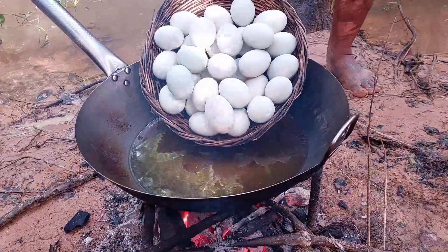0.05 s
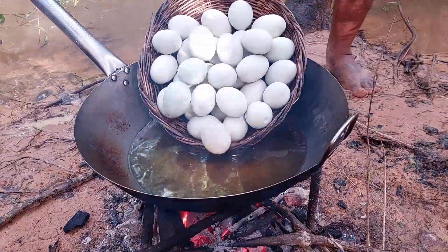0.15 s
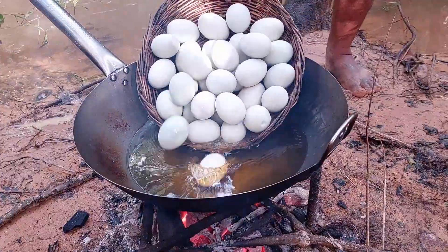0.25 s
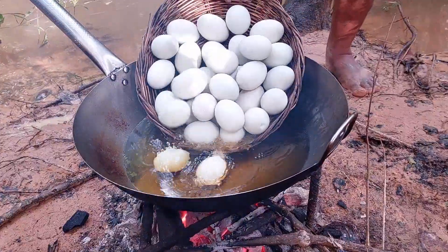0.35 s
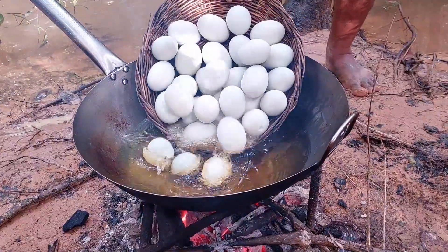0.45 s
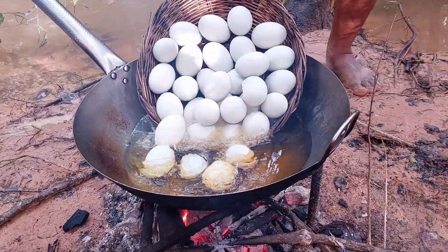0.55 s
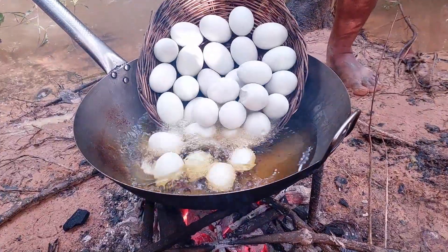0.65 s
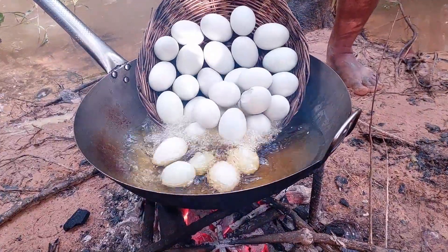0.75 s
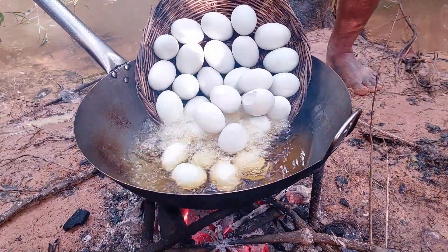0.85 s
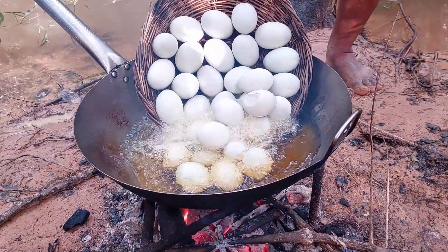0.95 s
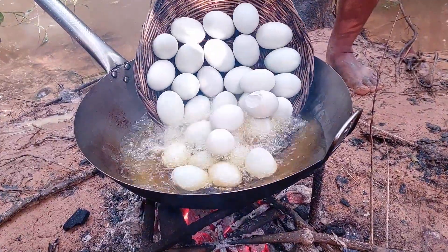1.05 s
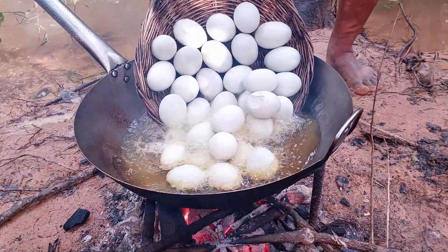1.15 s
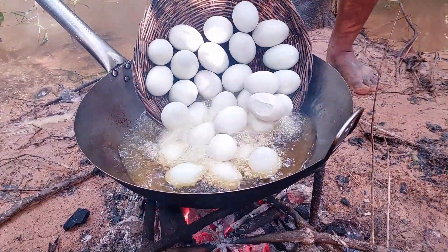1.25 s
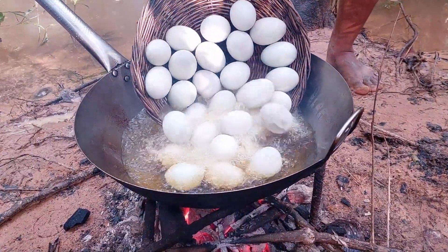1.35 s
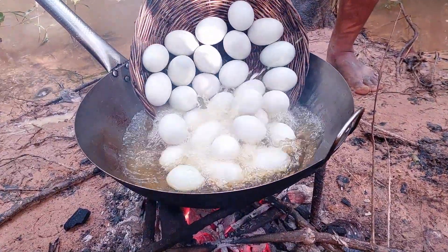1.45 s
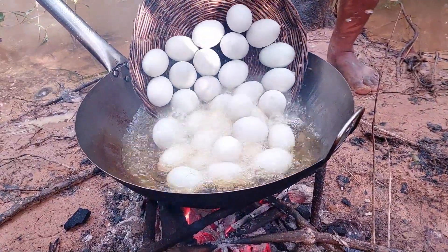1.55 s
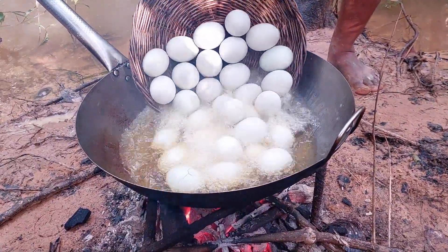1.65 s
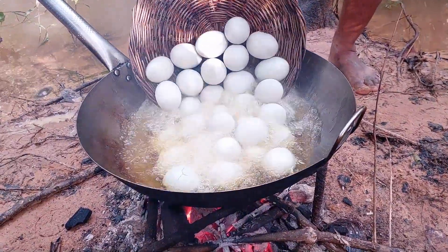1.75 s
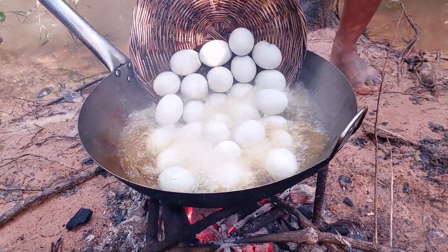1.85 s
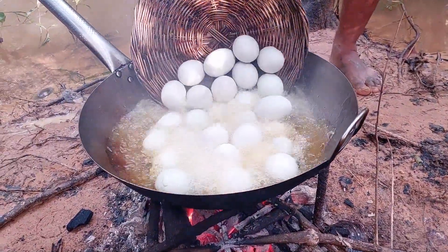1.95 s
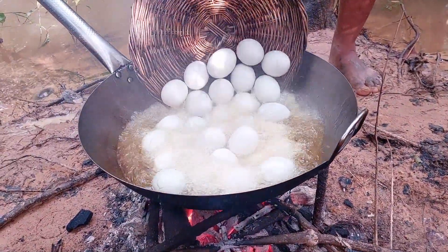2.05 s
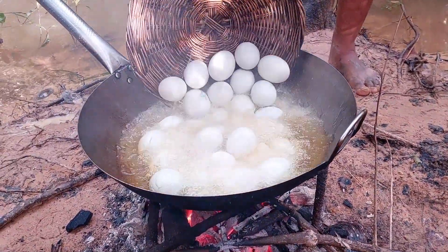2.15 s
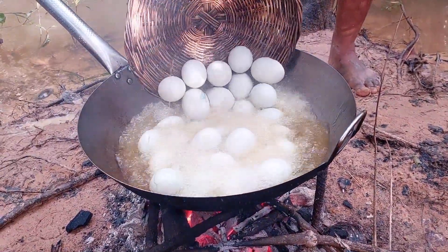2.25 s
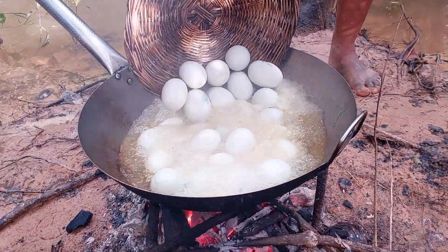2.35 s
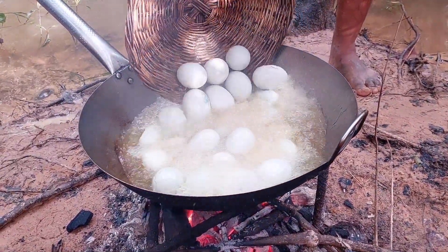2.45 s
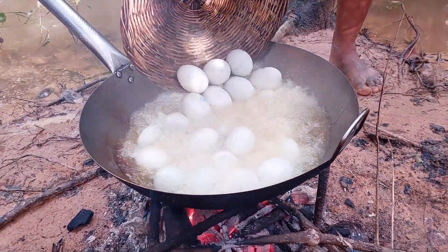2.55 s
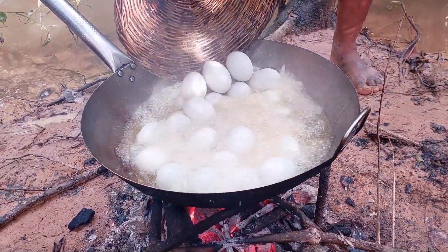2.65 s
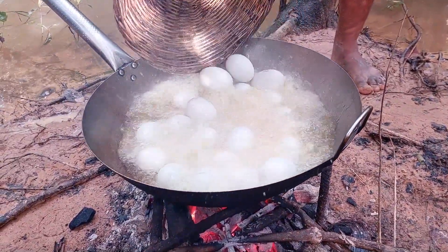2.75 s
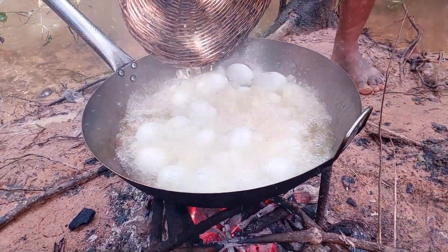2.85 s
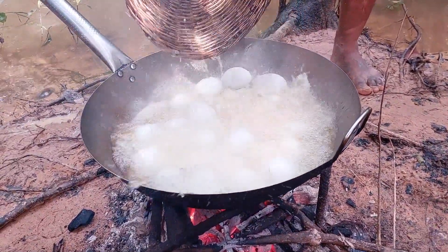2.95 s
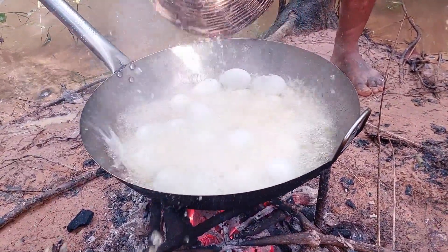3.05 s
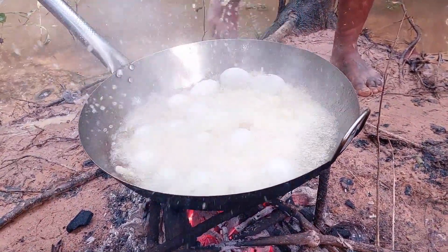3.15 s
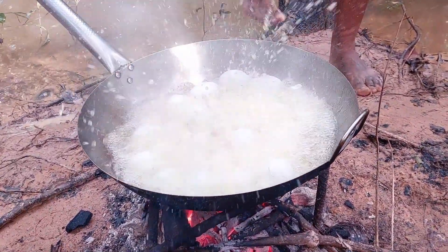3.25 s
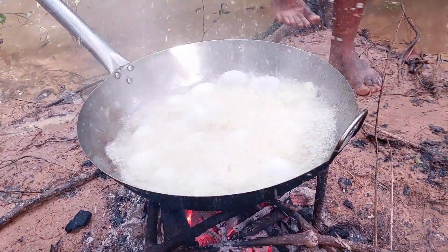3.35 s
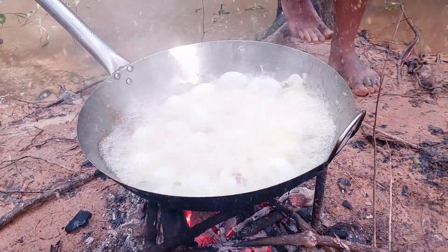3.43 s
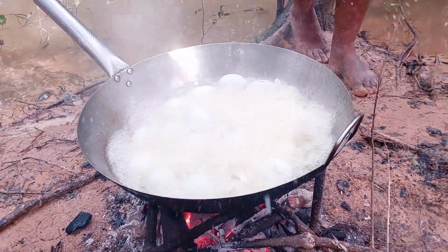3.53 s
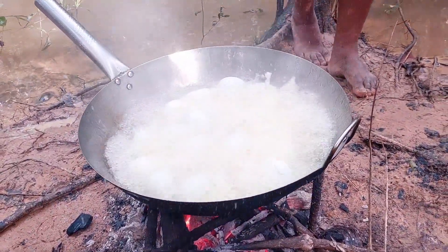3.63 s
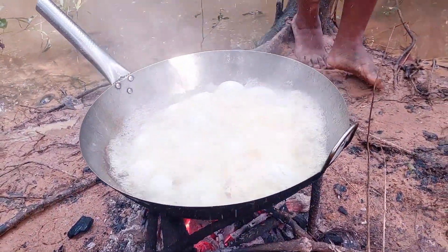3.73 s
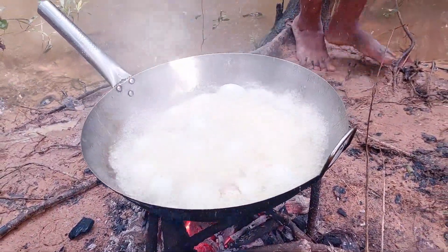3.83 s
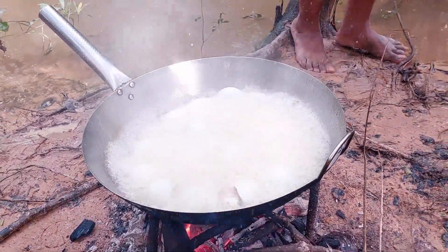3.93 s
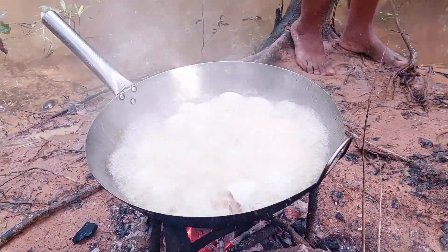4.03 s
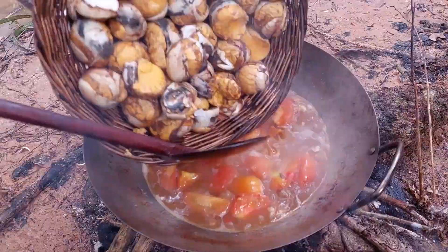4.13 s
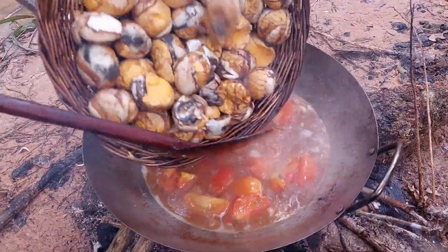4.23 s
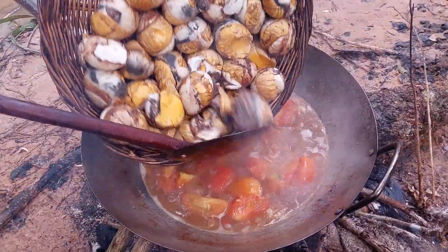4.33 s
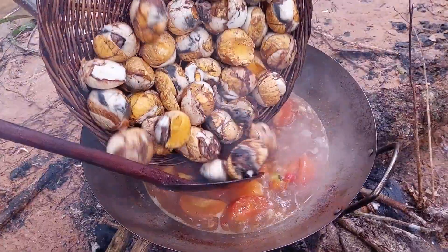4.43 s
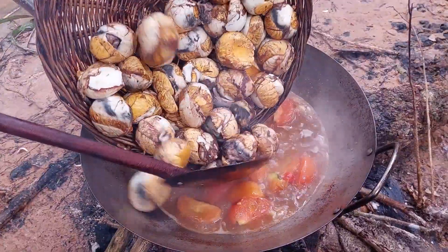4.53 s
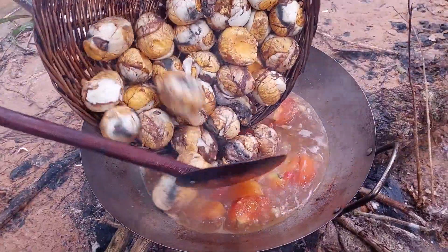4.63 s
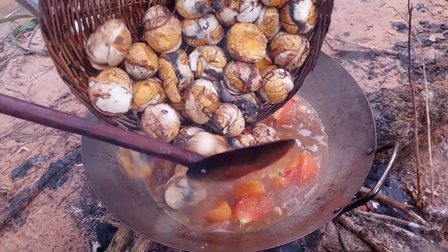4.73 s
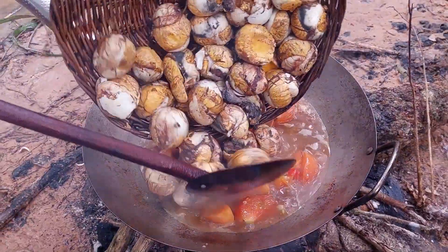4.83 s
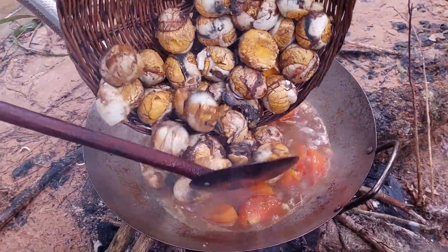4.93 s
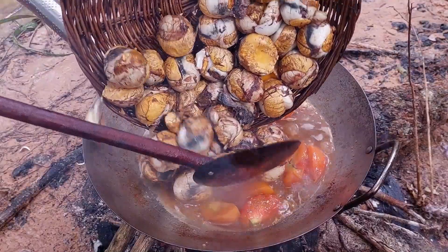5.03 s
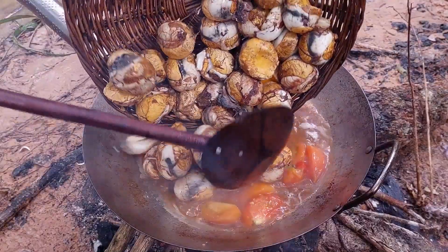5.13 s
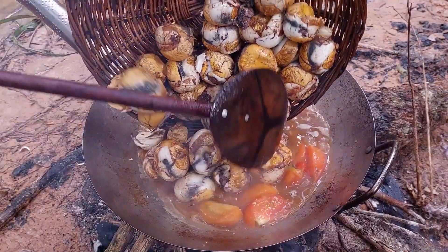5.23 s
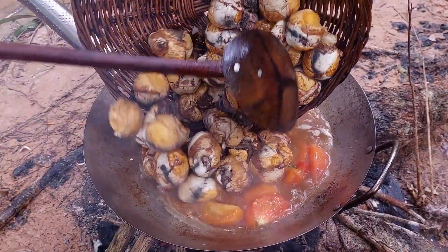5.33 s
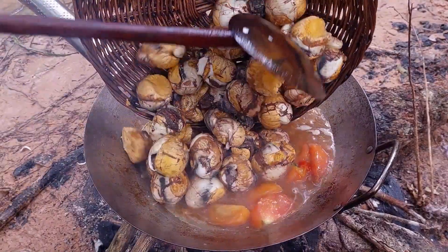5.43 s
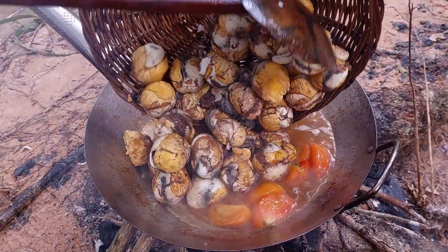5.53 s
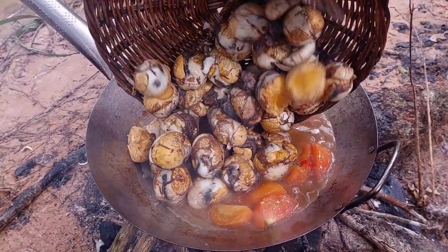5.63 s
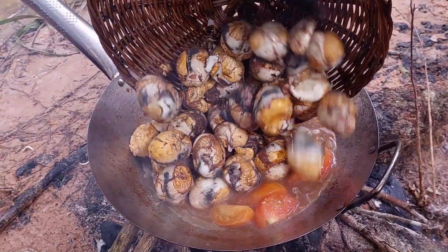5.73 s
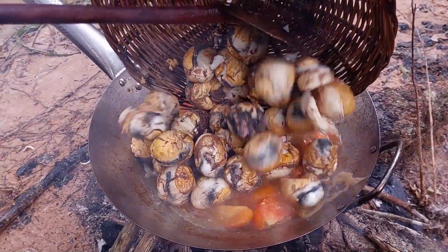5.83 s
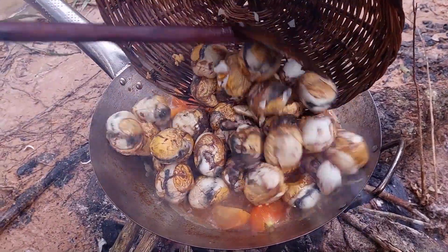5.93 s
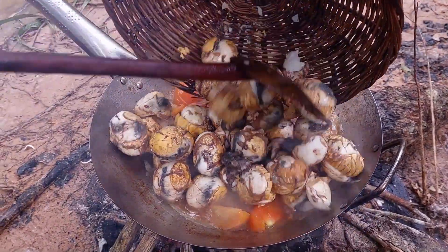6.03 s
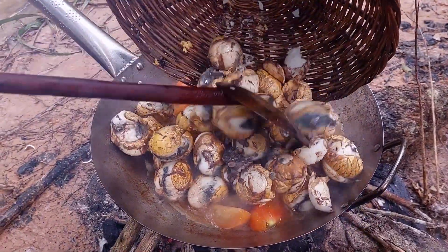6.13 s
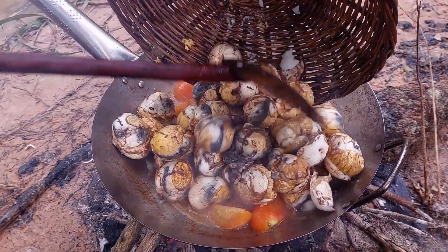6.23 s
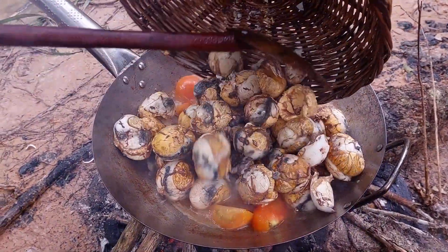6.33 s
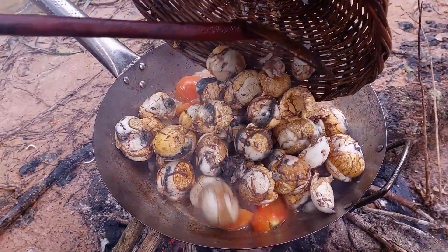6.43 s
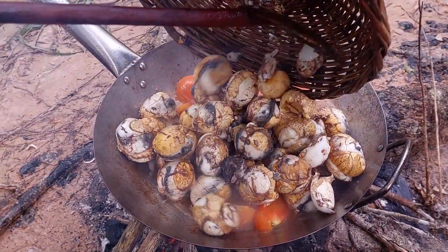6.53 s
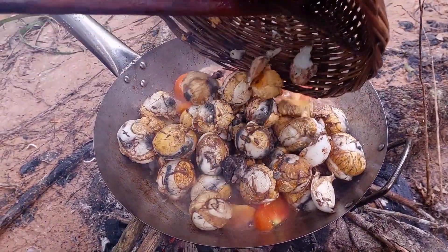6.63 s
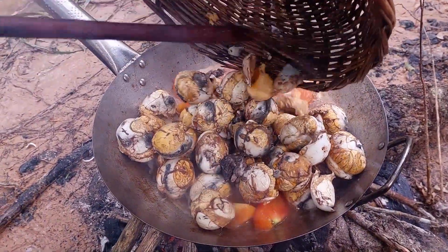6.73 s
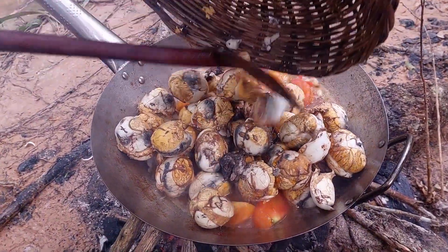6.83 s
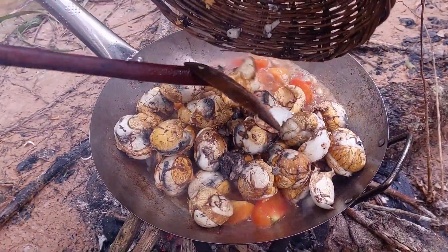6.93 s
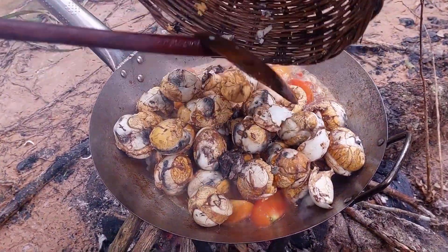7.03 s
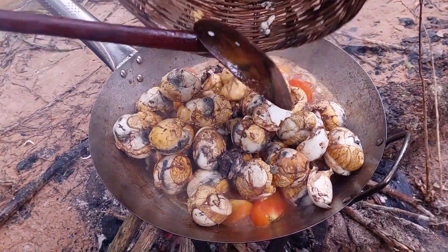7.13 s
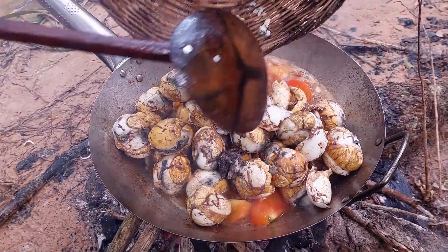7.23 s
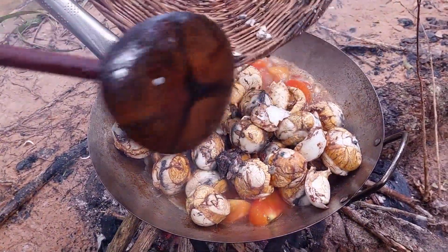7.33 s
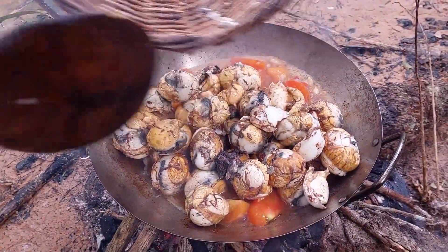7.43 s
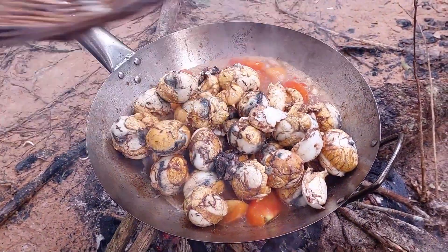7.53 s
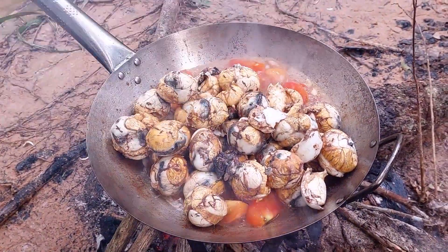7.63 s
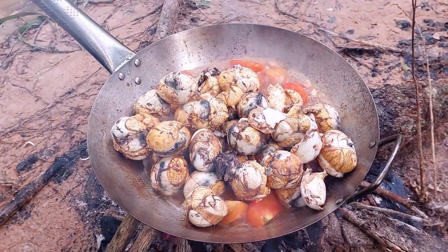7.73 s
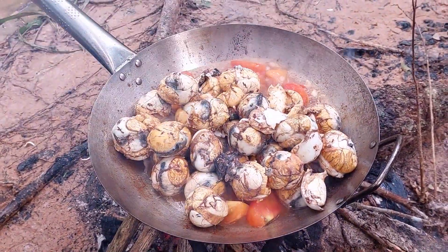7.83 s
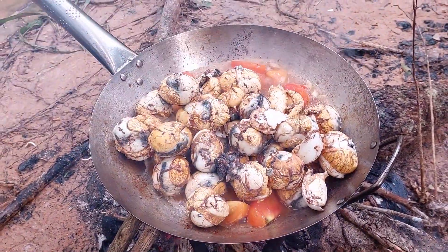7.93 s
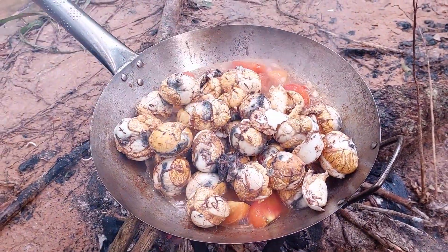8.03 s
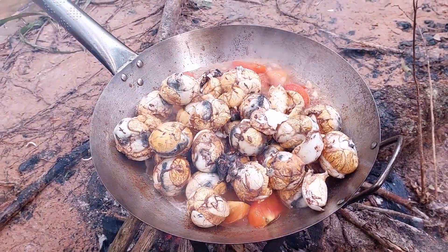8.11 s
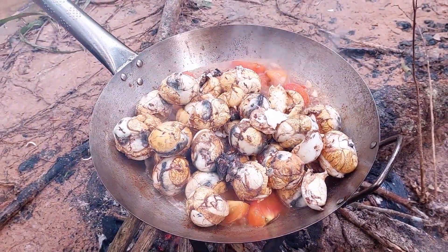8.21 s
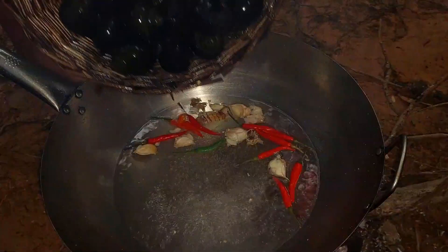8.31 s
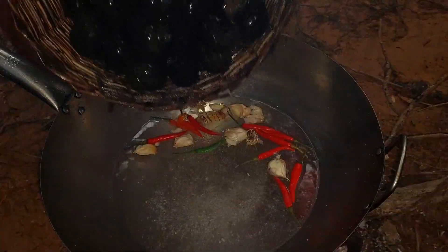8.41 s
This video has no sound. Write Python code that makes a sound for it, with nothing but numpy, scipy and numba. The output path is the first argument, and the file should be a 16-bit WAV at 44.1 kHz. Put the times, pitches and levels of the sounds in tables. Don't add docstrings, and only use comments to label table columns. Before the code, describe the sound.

A faint fire roar and first sizzle grow within seconds into roaring oil, hollow in the metal bowl, with hard shell clacks, wet plops and snapping droplets. The sound suddenly drops to soft blubbing sauce and small wicker ticks. A crisp sizzling flare rises just before six seconds, dies away, then dull knocks of ladle and food end in near calm. Close microphone, dry open air.

```python
import sys
import numpy as np
from scipy import signal
from scipy.fft import rfft, irfft, next_fast_len
from scipy.io import wavfile
from scipy.ndimage import uniform_filter1d, map_coordinates
from numba import njit

SR = 44100
rng = np.random.default_rng(int(sys.argv[2]) if len(sys.argv) > 2 else 0)


def voltage_ratio(decibels):
    exponent = np.asarray(decibels, float) / 20
    return 10 ** exponent


def file_out(sig):
    cols = np.atleast_2d(sig).T
    lim = np.clip(cols, -1, 1)
    pcm = np.round(lim * 32767).astype(np.int16)
    wavfile.write(sys.argv[1], SR, pcm)


N = 373527
TIME = np.arange(N) / SR
CHANGE_S, LAST_CHANGE_S = 4.174, 8.33


def unit(x):
    return x / np.sqrt(np.mean(x ** 2) + 1e-20)


def along(points, hz):
    f, value = np.transpose(points)
    return np.interp(np.log(hz + 1), np.log(f + 1), value)


def over_time(points):
    return np.interp(TIME, *np.transpose(points))


def wobble(rate):
    knots = rng.standard_normal(int(N * 40 / SR) + 4)
    return map_coordinates(knots, [np.arange(N) * min(rate, 40) / SR])


def filtered(x, response):
    m = next_fast_len(N + 8192)
    return irfft(rfft(x, m) * response(np.fft.rfftfreq(m, 1 / SR)), m)[..., :N]


@njit
def add(out, rows, sr):
    for s, size, hz, t60, rise, attack, lag, right in rows:
        for port in range(2):
            start = (s + port * lag) * sr
            first = int(start) + 1
            gain = size * (right if port else 1.0)
            for i in range(max(first, 0), min(first + int(t60 * sr), out.shape[1])):
                t = (i - start) / sr
                swell = (1 - np.exp(-t / attack)) * np.exp(-np.log(1000) * t / t60)
                out[port, i] += gain * swell * np.sin(2 * np.pi * hz * t * (1 + rise * t / t60))
    return out


def rings(s, size, hz, t60, rise=0, attack=1e-5, lag=0, right=1):
    rows = np.broadcast_arrays(s, size, hz, t60, rise, attack, lag, right)
    return add(np.zeros((2, N)), np.stack([np.ravel(r) for r in rows], axis=1).astype(float), SR)


def burst(s, size, hz, wide_db, t60, smear, right=1):
    late, pitch, lag = rng.standard_normal((len(s), 3, 12)).T.swapaxes(0, 1)
    hz = np.minimum(hz * voltage_ratio(wide_db * pitch), SR / 2.5)
    return rings(s + smear * np.abs(late), size / np.sqrt(8), hz, t60, lag=5e-5 * lag, right=right)


# pitch_hz, correlation
LIKENESS = [(60, 0.6), (150, 0.62), (380, 0.82), (950, 0.57), (2380, 0.55), (5980, 0.055), (15000, -0.08)]


def seethe(spectrum, count, cycles, size_db, share, patchy_db):
    f = np.transpose(spectrum)[0]
    when, pitch, big = rng.random((count, 3)).T
    hz = f[1] * (f[-2] / f[1]) ** pitch
    lag = 7e-5 * rng.standard_normal(count)
    bubbles = rings(when * N / SR, voltage_ratio(-size_db * np.log(big + 0.022)), hz, cycles / hz, rise=0.38, lag=lag)
    bubbles = filtered(bubbles, lambda hz: voltage_ratio(along(spectrum, hz)) * hz)

    z = signal.stft(rng.standard_normal((2, N)), nperseg=256)[2]
    patches = uniform_filter1d(rng.standard_normal(z.shape[1:]), size=5, axis=0)
    patches = uniform_filter1d(patches, size=8, axis=1)
    pair = signal.istft(z * voltage_ratio(patchy_db * unit(patches)), nperseg=256)[1][:, :N]

    def mid_side(hz):
        turn = np.arccos(np.clip(along(LIKENESS, hz), 0, 1)) / 2
        return voltage_ratio(along(spectrum, hz)) * np.array([np.cos(turn), np.sin(turn)])

    mid, side = filtered(pair, mid_side)
    bed = np.array([mid + side, mid - side])
    share = np.clip(share, 0, 1)
    return np.sqrt(share) * unit(bubbles) + np.sqrt(1 - share) * unit(bed)


# pitch_hz, density_db
SPATTER_SPECTRUM = [(1200, -40), (2500, -19), (5000, -2), (8500, -15.5), (12800, 3), (15500, -12),
                    (17000, -48)]


def spatter():
    clicks = seethe(SPATTER_SPECTRUM, count=900, cycles=1.5, size_db=3.5, share=1, patchy_db=0)
    tear = rng.standard_normal((1, 40)) * np.hanning(40)
    return unit(clicks + signal.fftconvolve(clicks, tear / 4, axes=1)[:, :N])


def boil(levels, froth, gurgle, crackle, steam, surge_db, coarse, deep):
    froth_db, gurgle_db, crackle_db, steam_db = levels
    surge = surge_db * wobble(18)
    foam = seethe(froth, count=8500, cycles=8.6, size_db=2.5, share=0.52 * coarse, patchy_db=2.0)
    shallow = filtered(foam, lambda hz: 1 / (1 + (1600 / (hz + 1)) ** 9))
    out = voltage_ratio(froth_db + surge + 0.84 * coarse * wobble(30)) * (deep * foam + (1 - deep) * shallow)
    out += voltage_ratio(gurgle_db + surge + 1.3 * wobble(25)) * seethe(
        gurgle, count=2200, cycles=4.7, size_db=1.5, share=0.49 * coarse, patchy_db=1.2)
    out += voltage_ratio(crackle_db + surge + 1.16 * coarse * wobble(30)) * seethe(
        crackle, count=12000, cycles=7.8, size_db=3.0, share=0.5 * coarse, patchy_db=0.0)
    out += voltage_ratio(steam_db + surge + 1.0 * coarse * wobble(30)) * seethe(
        steam, count=14000, cycles=8.3, size_db=4.5, share=0.44 * coarse, patchy_db=2.5)
    return out + voltage_ratio(steam_db - 8.5) * coarse ** 2 * deep * spatter()


# time_s, vigour_db
VIGOUR = [(.08, -50), (.15, -43), (.24, -38), (.6, -30.5), (.76, -27), (.82, -30.5), (1.28, -23.5),
          (1.98, -22.5), (2.49, -18.5), (3.05, -23), (3.22, -22.5), (3.25, -28.5), (3.33, -26),
          (3.64, -23.5), (4.17, -23)]
# full_boil_db, db_per_db_of_vigour, under_foam_db, lag_behind_foam_s
OIL_SIZES = [
    (-23, 1, 0, 0),
    (-41, 0.5, 13.5, 0.2),
    (-23, 0.91, -6.5, 0),
    (-25, 0.6, -0.5, 0.019),
]
# peak_s, gain_db, rise_s, fall_s
STEAM_JETS = [
    (.065, 5.5, .01, 0.13),
    (.77, 5.5, 0.069, 0.027),
    (3.15, 1.5, 0.44, .07),
    (3.33, 5.5, .05, 0.035),
    (3.64, 1.5, 0.099, .2),
    (4.14, 1, 0.035, .1),
]


def frying():
    full_boil_db = -23.5
    flash_s, boil_s, glug_s = 0.062, 0.072, 0.148
    foam_s, foam_spread_s = 2.26, 0.2
    vigour_db = over_time(VIGOUR) - full_boil_db
    levels = []
    for db, grows, under_db, lag in OIL_SIZES:
        foam = 1 / (1 + np.exp((foam_s + lag - TIME) / foam_spread_s))
        levels.append(db + grows * vigour_db + under_db * foam - 30 * (TIME < boil_s))
    froth, gurgle, crackle, steam = levels
    gurgle = gurgle - 12 * (TIME < glug_s)
    for s, db, rise, fall in STEAM_JETS:
        steam = steam + db * np.exp(-((TIME - s) / np.where(TIME < s, rise, fall)) ** 2)
    steam = steam + 30 * ((TIME >= flash_s) & (TIME < boil_s))
    return [froth, gurgle, crackle, steam]


# pitch_hz, width_hz, level_db
WOK_MODES = [(504, 160, -3.5), (892, 150, -2.5), (1360, 176, -5), (2170, 210, -4.5), (4530, 350, -9.5)]


def hollow(x):
    ring = filtered(x, lambda f: sum(voltage_ratio(db) * 1j * f * width / (hz * hz - f * f + 1j * f * width)
                                     for hz, width, db in WOK_MODES))
    return voltage_ratio(-2.2) * (x + voltage_ratio(-3 + 1.5 * wobble(4)) * ring)


def bowl(x, delay, strength, dull_hz):
    def comb(hz):
        echo = strength * np.exp(-2j * np.pi * hz * delay) / (1 + (hz / dull_hz) ** 2)
        return (1 + echo) / np.sqrt(1 + strength ** 2 / 2)
    return filtered(x, comb)


# start_s, peak_db, body_db, left_minus_right_db
SPIT_EVENTS = [(0.059, -35, -16, -15.5), (0.8837, -20, -5, -4), (1.0962, -13, -17, 0),
               (1.5579, -14, -33, -14), (1.5778, -16, -26, -1), (1.775, -17, -9, -14.5),
               (2.271, -25, -13, -4), (2.5726, -11, -4, -18), (2.6703, -16, -19, -2),
               (2.835, -11.5, 8, -10), (2.9028, -20, 8, -11), (2.984, -9, -26, -10), (3.034, -18, -9, -15),
               (3.3007, -9, -15, 1), (3.3158, -11, -12, -4), (3.3892, -7, -22, -9), (3.641, -15, -12, 10),
               (3.696, -20, -14, -3.0), (3.716, -13, -20, 0)]


def spits():
    s, db, body_db, pan_db = np.transpose(SPIT_EVENTS)
    pan_db = np.clip(pan_db, -9, 4)
    left = voltage_ratio(db + pan_db / 2)
    snap = burst(s + 0.0017, voltage_ratio(6.0) * left, 12150, wide_db=3.0, t60=0.0041, smear=0.000827,
                 right=voltage_ratio(-pan_db))
    body = left * voltage_ratio(np.minimum(body_db, 0) + 15.5)
    return snap + burst(s + 0.00049, body, 4700, wide_db=3.5, t60=0.0029, smear=0.000276)


# start_s, peak_db, pitch_hz
POP_EVENTS = [(0.554, -14, 3010), (0.6217, -12, 2210), (0.654, -7, 3380), (0.6816, -17, 3190),
              (0.8761, -18, 2150), (0.9041, -18, 2340), (0.926, -12, 3290), (1.2099, -19, 2270),
              (1.24, -13, 1800), (1.2723, -11, 1600), (1.442, -9, 2250), (1.4663, -18, 1020),
              (1.4833, -8, 1260), (1.603, -11, 1030), (1.7087, -14, 1390), (1.7492, -8, 1360),
              (1.8394, -8, 2270), (1.8828, -10, 2220), (1.9208, -10, 2220), (1.9595, -12, 1220),
              (1.9971, -10, 2220), (2.0964, -13, 3430), (2.3124, -9, 1400), (2.3905, -8, 1370),
              (2.506, -7, 2240), (2.582, -12, 2210), (2.6147, -21, 2200), (2.6704, -20, 1650),
              (2.693, -12, 1370), (2.878, -8, 2790), (2.899, -17, 1290), (2.9165, -11, 2070),
              (2.937, -12, 1350), (2.968, -12, 1360), (3.0098, -19, 1760), (3.032, -14, 1410),
              (3.121, -9, 2180), (3.1884, -23, 1370), (3.2104, -9, 1340), (3.2345, -7, 1300),
              (3.2652, -15, 1390), (3.356, -13, 1300), (3.4004, -17, 1350), (3.4248, -17, 1550),
              (3.596, -15, 1320), (3.6219, -12, 2160), (3.799, -11, 1280), (3.848, -11, 1360),
              (3.882, -12, 1570), (3.9008, -13, 1410), (3.9272, -19, 1360), (3.945, -17, 1000),
              (4.0175, -14, 2170), (4.0549, -11, 2170), (4.0983, -14, 2290), (4.1208, -14, 2230)]


def pops():
    s, db, hz = np.transpose(POP_EVENTS)
    ring = rings(s, voltage_ratio(db - 1.0), hz, 16 / hz, rise=0.06, attack=0.00024)
    return ring + burst(s, voltage_ratio(db - 11), hz, wide_db=2.5, t60=0.0079, smear=0.00201)


# start_s, peak_db, low_mode_db, t60_s
SHELL_CLACKS = [
    (0.3603, -19.5, 1, 0.019),
    (0.417, -9.5, -35.5, 0.057),
    (0.4544, -29.5, -10.5, 0.05),
    (0.5513, -5, -8.5, 0.036),
    (0.6542, -14, 2, 0.023),
    (0.7996, -22, -14.5, 0.084),
    (0.8652, -18, 5, 0.029),
    (1.0222, -19, -13, 0.036),
    (1.06, -26, -9, 0.036),
    (1.097, -28, 6, 0.091),
]
# pitch_hz, level_db, share_of_t60
SHELL_MODES = [(4540, 0.5, 1), (4240, -6, .7), (4660, -3.5, 0.56), (4840, -13, .7), (3810, -8, 0.86),
               (3350, -11, 0.73), (5600, -11, 0.55), (5900, -8, 0.44)]


def shells():
    s, db, low_db, t60 = np.transpose(SHELL_CLACKS)
    hz, mode_db, life = np.transpose(SHELL_MODES)
    late, strike, detune = rng.standard_normal((3, len(s), len(hz)))
    out = rings(s[:, None] + .0012 + .0004 * np.abs(late), voltage_ratio(db[:, None] + mode_db - 2 + 1.2 * strike),
                hz * (1 + 0.014 * detune), life * t60[:, None], attack=0.00056)
    out += rings(s, voltage_ratio(db - 16.0), 3600, .0012)
    out += burst(s, voltage_ratio(db - 8), 3800, wide_db=2.5, t60=0.24 * t60, smear=0.00127)
    out += burst(s, voltage_ratio(db + low_db - 3.5), 2260, wide_db=0.7, t60=0.77 * t60, smear=0.00102)
    out += burst(s + .004, voltage_ratio(db - 7.5), 3900, wide_db=1.1, t60=.3 * t60, smear=0.011)
    return out * voltage_ratio([[-.4], [.4]])


# start_s, peak_db, pitch_hz
PLOP_EVENTS = [(0.305, -26, 393), (0.439, -21.5, 416), (0.469, -21, 500), (0.446, -29, 420), (0.479, -27, 520),
               (0.49, -29, 480), (0.542, -16.5, 386), (0.548, -21, 460), (0.567, -27, 450), (0.584, -21.5, 500),
               (0.606, -27, 320), (0.719, -26, 270), (0.82, -22, 774), (0.93, -19.5, 845), (1.032, -19, 480),
               (1.433, -22, 695), (1.472, -13, 945), (1.483, -4.5, 503), (1.605, -14, 928), (1.725, -14.5, 496),
               (2.559, -12.5, 780), (2.827, -10, 875), (2.95, -9.5, 520), (2.968, -7.5, 510), (3.023, -11, 894),
           (3.033, -12, 464), (3.069, -32, 460), (3.136, -12, 460), (3.175, -11.5, 480), (3.224, -8, 584),
           (3.236, -11, 475), (3.356, -15.5, 816), (3.4, -16, 888), (3.39, -15, 240), (3.55, -16.5, 480),
           (3.564, -14.5, 790), (3.435, -8.5, 776), (3.445, -9.5, 440), (3.617, -11, 740),
           (3.624, -13, 450), (3.709, -13, 740), (3.741, -18.5, 240), (3.85, -16, 530), (3.95, -10.5, 860),
           (3.964, -17, 895), (4.018, -14, 790), (4.037, -19, 422), (4.05, -16, 520), (4.066, -12, 850),
           (4.098, -15, 770), (4.116, -16, 520)]
# start_s, peak_db, pitch_hz
FOAM_HEAVES = [
    (1.482, -35, 120),
    (2.558, -15, 110),
    (3.389, -12, 90),
    (3.442, -24, 119),
    (3.74, -15, 90),
]


def plops():
    s, db, hz = np.array(PLOP_EVENTS).T
    slap = rings(s - .0006, voltage_ratio(db - 4.5), 3.2 * hz, 2.0 / hz)
    slap += burst(s, voltage_ratio(db - 3.0), 1740, wide_db=3.5, t60=0.0079, smear=.003)
    cavity = rings(s, voltage_ratio(db + 2.5), hz, 8 / hz, rise=0.047, lag=6e-5, right=.9)
    at, heave_db, low_hz = np.transpose(FOAM_HEAVES)
    push = rings(s, voltage_ratio(db - 27), 230, 0.052)
    push += rings(at, voltage_ratio(heave_db), low_hz, 2.4 / low_hz, attack=.0015)
    return slap + cavity + filtered(push, lambda f: (1j * f / (60 + 1j * f)) ** 2)


# pitch_hz, density_db
OIL_FROTH = [(350, -31), (600, -8.5), (913, -2.5), (1070, -6.5), (1340, -2.5), (3200, -4.5), (4160, -6.5),
             (7040, -120)]
OIL_GURGLE = [(53, -42), (90, -4.5), (215, 2), (353, -5.5), (456, 3), (750, 1), (980, -34), (1650, -120)]
OIL_CRACKLE = [(1650, -17.5), (2800, -9), (4430, -7), (5170, -13), (6500, -19), (8450, -26.5),
               (14300, -120)]
OIL_STEAM = [(3240, -27), (5500, -1.5), (6510, -6), (8530, -6.5), (10700, -3.5), (12500, 1.5), (14900, -2),
             (16100, -4), (16400, -61)]


def oil():
    seething = boil(frying(), OIL_FROTH, OIL_GURGLE, OIL_CRACKLE, OIL_STEAM,
                    surge_db=0.64, coarse=0.96, deep=np.clip(TIME / 1.66, 0, 1))
    in_wok = hollow(bowl(seething + spits(), 0.002284, 0.13, dull_hz=3380))
    return in_wok + pops() + shells() + plops()


# peak_s, heat_db, rise_s
SAUCE_FLARES = [
    (4.815, -50.5, .01),
    (5.33, -34.5, 0.12),
    (5.91, -26, .009),
    (8.42, -48.5, 0.098),
]
# lively_db, db_per_db_of_heat, cooling_s
SAUCE_SIZES = [
    (-43, .6, 0.35),
    (-46, 0.22, 0.085),
    (-39, 1, 0.28),
    (-30, 1, 0.27),
]


def simmering():
    simmer_db, warms_db_per_s, lively_db = -56.5, 7, -30
    dries_db_per_s = -1.06
    stirred_s, still_db = 7.33, -4
    warming_s = np.clip(np.where(TIME < LAST_CHANGE_S, TIME - CHANGE_S, -1), -1, 1)
    calm = voltage_ratio(simmer_db + warms_db_per_s * warming_s) ** 2
    levels = []
    for size_db, grows, cools in SAUCE_SIZES:
        heat = calm
        for s, db, rise in SAUCE_FLARES:
            since = TIME - s
            flare = voltage_ratio(db + dries_db_per_s * since) ** 2 * np.clip(1 + since / rise, 0, 1) ** 2
            in_view = (TIME < LAST_CHANGE_S) | (s > LAST_CHANGE_S)
            heat = heat + flare / (1 + np.maximum(since, 0) / cools) * in_view
        levels.append(size_db + grows * (10 * np.log10(heat) - lively_db))
    froth, gurgle, crackle, steam = levels
    gurgle = gurgle + still_db * np.clip((TIME - stirred_s) * 10, 0, 1)
    return [froth, gurgle, crackle, steam]


# start_s, peak_db, pitch_hz
BLUB_EVENTS = [(4.258, -38, 590), (4.303, -33, 1160), (4.446, -39, 635), (4.481, -35, 730),
               (4.552, -40, 710), (4.728, -33, 610), (4.796, -31, 680), (4.809, -37, 656),
               (4.865, -39, 754), (4.927, -32.5, 690), (4.944, -38, 730), (4.975, -38, 800),
               (4.989, -35, 724), (5.101, -37, 553), (5.117, -38, 655), (5.165, -38, 670), (5.23, -36, 730),
               (5.255, -35, 720), (5.285, -34, 736), (5.308, -38, 1090)]


def blubs():
    s, db, hz = np.transpose(BLUB_EVENTS)
    return rings(s, voltage_ratio(db + 3.5), hz, 14 / hz, rise=0.1, attack=0.00054)


def basket(x):
    delay_s, sway_s, strength = .0005, .00012, .36
    at = np.arange(N) - SR * (delay_s + sway_s * wobble(2.5))
    echo = np.array([map_coordinates(port, [at + shift]) for port, shift in zip(x, (0, 3))])
    return (x + strength * echo) / np.sqrt(1 + strength ** 2)


# pitch_hz, density_db
SAUCE_FROTH = [(560, -34), (950, -5.5), (1350, -0.5), (2100, -3), (3000, -6), (3600, -5), (5000, -60),
               (7000, -120)]
SAUCE_GURGLE = [(120, -43), (200, 0.5), (439, -6.5), (789, -0.5), (973, -8.5), (1200, -6), (1560, -51),
                (2640, -120)]
SAUCE_CRACKLE = [(1530, -21), (2600, -7), (3900, 1.5), (4990, -3.5), (5640, -2), (6500, -10), (8450, -42),
                 (14300, -120)]
SAUCE_STEAM = [(2940, -37), (5000, -6.5), (5630, -8.5), (9030, -8), (12200, 0), (15100, 0.5), (16200, -10),
               (16400, -37)]


def sauce():
    seething = boil(simmering(), SAUCE_FROTH, SAUCE_GURGLE, SAUCE_CRACKLE, SAUCE_STEAM,
                    surge_db=0.2, coarse=0.54, deep=0.98)
    return basket(bowl(seething, 0.00152, 0.22, dull_hz=4000) + blubs())


# start_s, level_db, pitch_hz, length_s, pitch_spread
SEAR_EVENTS = [(.235, -34, 4200, .012, .3), (.578, -33, 2100, .025, .1), (.612, -32, 2120, .03, .1),
               (2.932, -19, 3300, .02, .9), (3.19, -19.5, 3700, .02, .7), (3.43, -24, 3300, .012, .9),
               (3.625, -25, 3200, .012, .6), (5.905, -32, 4400, 0.098, .28), (5.935, -36, 4300, 0.086, .28),
               (6.09, -39, 3600, 0.095, .28), (6.13, -36, 3700, 0.055, .28), (6.26, -40, 3600, 0.049, .28)]


def sears():
    s, db, hz, length, spread = np.transpose(SEAR_EVENTS)
    late, pitch, lag = rng.random((len(s), 3, 90)).T.swapaxes(0, 1)
    return rings(s + length * late ** 1.5, voltage_ratio(db), hz * (1 + spread * (pitch - .5)), 24 / hz,
                 attack=.0002, lag=3e-4 * (lag - .5))


# start_s, peak_db, pitch_hz
TICK_EVENTS = [(0.028, -41, 4000), (4.2243, -43, 4700), (4.255, -39, 3440), (4.425, -35.5, 1600),
               (4.4612, -31.5, 1700), (4.5526, -41, 2500), (4.6043, -40, 2200), (4.7163, -41, 2190),
               (4.777, -36, 2790), (4.917, -30.5, 2340), (4.965, -43, 2620), (4.996, -31, 2700),
               (5.07, -43, 2560), (5.102, -34, 2700), (5.1188, -36, 2220), (5.232, -33, 2150),
               (5.7897, -43, 2190), (8.3898, -35, 2060), (8.407, -36, 1750), (8.427, -37, 1930)]
# start_s, peak_db, pitch_hz, t60_s
KNOCK_EVENTS = [(4.632, -37, 354, 0.051), (4.947, -41, 226, 0.13), (5.167, -36.5, 298, 0.15),
                (5.787, -36, 590, 0.058), (6.539, -38, 338, 0.093), (6.579, -39, 434, 0.09),
                (6.768, -33.5, 326, 0.12), (6.864, -29, 346, 0.045), (6.891, -32, 338, 0.2),
                (6.913, -26.5, 263, 0.089), (6.94, -38, 333, 0.17), (6.981, -33, 342, 0.11),
                (7.29, -32, 269, 0.035), (8.428, -40, 418, 0.11)]
# pitch_hz, level_db, t60_s
STEEL_MODES = [(378, -36, 0.43), (730, -47, 0.87), (889, -58, .3), (1020, -47, 0.64), (1081, -47, 0.75)]
# start_s, peak_db, pitch_hz, t60_s
EGG_PING = (.148, -31, 891, .16)


def ladle():
    s, db, hz = np.transpose(TICK_EVENTS)
    out = rings(s, voltage_ratio(db + 1.5), 4200, 0.00088)
    out += burst(s, voltage_ratio(db - 9), 2900, wide_db=1.6, t60=.022, smear=.004)
    out += burst(s, voltage_ratio(db - 2.5), hz, wide_db=1.7, t60=0.012, smear=0.00214)
    out += burst(s, voltage_ratio(db - 6.0), 6500, wide_db=3.0, t60=0.0047, smear=0.00086)
    out += rings(5.877, voltage_ratio(-19), [1500, 3000, 5200, 8000], .0012)
    s, db, hz, t60 = EGG_PING
    out += rings(s, voltage_ratio(db), hz, t60, attack=.001)
    s, db, hz, t60 = np.transpose(KNOCK_EVENTS)
    out += rings(s, voltage_ratio(db + 0.5), hz, t60, attack=0.001)
    out += burst(s, voltage_ratio(db - 4.5), 1.5 * hz, wide_db=4.5, t60=0.66 * t60, smear=0.011)
    hz, db, t60 = np.transpose(STEEL_MODES)
    return out + rings(5.168, voltage_ratio(db), hz, t60, attack=0.0049)


# time_s, roar_db
FIRE_LEVEL = [(0, -47), (.6, -49.5), (2.2, -58), (2.9, -46.5), (4.15, -47), (4.2, -52), (7.2, -46.5),
              (8.15, -48), (8.47, -53.5)]
# pitch_hz, density_db
ROAR_SPECTRUM = [(15, -46), (25, -36), (54, 0.5), (104, -1.5), (148, -5.5), (178, -15.5), (320, -22.5),
                 (420, -49), (700, -120)]


def fire():
    level = voltage_ratio(over_time(FIRE_LEVEL) + 4.5 + 2.0 * wobble(10))
    roar = seethe(ROAR_SPECTRUM, count=200, cycles=1.4, size_db=-1.5, share=0.28, patchy_db=1.0)
    draught = unit(filtered(rng.standard_normal((2, N)), lambda hz: hz ** 3 / (1 + (hz / 75) ** 6)))
    preamp = filtered(rng.standard_normal((2, N)), lambda hz: 1 / (1 + (hz / 6400) ** 12))
    return level * (roar + voltage_ratio(-6.5) * draught) + voltage_ratio(-58) * preamp


def scene():
    before = np.clip((CHANGE_S - TIME) / 0.0009, 0, 1)
    pan = before * oil() * voltage_ratio([[-.7], [.7]])
    pan = pan + (1 - before) * sauce() * voltage_ratio([[.4], [-.4]])
    return pan + ladle() + sears() + fire()


def low_pass(x):
    return signal.sosfilt(signal.butter(12, 17030, fs=SR, output="sos"), x)


# pitch_hz, left_minus_right_db
PORT_COLOUR = [(50, 2.5), (150, -1.3), (500, -1.8), (1200, 1.9), (2400, 0.4), (4400, -2.5), (8000, 4.5),
               (12500, -5), (16000, -4)]
# start_s, depth_db, recovery_s
GAIN_DUCKS = [
    (.835, -2, 0.045),
    (1.318, -7, 0.048),
    (1.574, -4.5, 0.031),
    (2.55, -2, 0.029),
    (2.984, -7.5, 0.022),
    (3.299, -11, 0.0076),
    (3.392, -19, 0.0075),
    (3.72, -2.5, 0.048),
    (3.99, -2.5, 0.053),
    (4.777, -3.5, 0.046),
]


def record(dry):
    half = np.array([[.5], [-.5]])
    port_lag_s = 5e-5
    x = filtered(dry, lambda hz: voltage_ratio(along(PORT_COLOUR, hz) * half) * np.exp(2j * np.pi * hz * port_lag_s * half))
    x = filtered(x, lambda hz: (hz < 15950) * (1j * hz / (45 + 1j * hz)) ** 2)
    duck_db = sum(db * (TIME > s) * np.exp(-(np.abs(TIME - s) / back) ** 2) for s, db, back in GAIN_DUCKS)
    x = x * voltage_ratio(uniform_filter1d(duck_db, size=90))
    x = x / (1 + np.abs(x / 1.1) ** 4) ** (1 / 4)
    return low_pass(x)


dry = scene()
out = record(dry)
file_out(out)
```